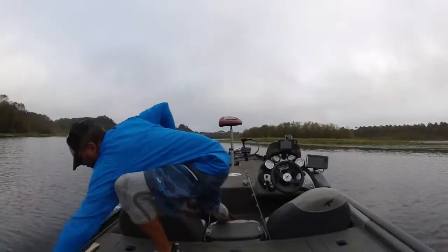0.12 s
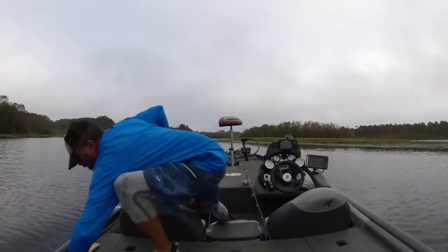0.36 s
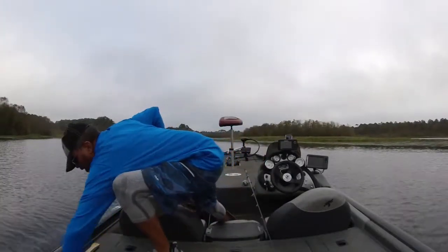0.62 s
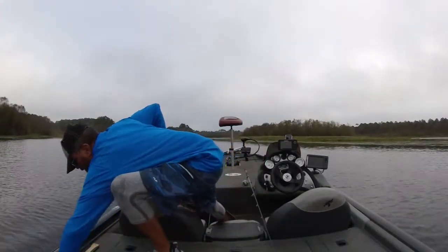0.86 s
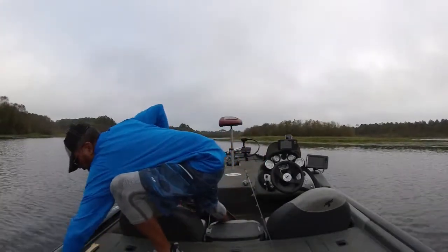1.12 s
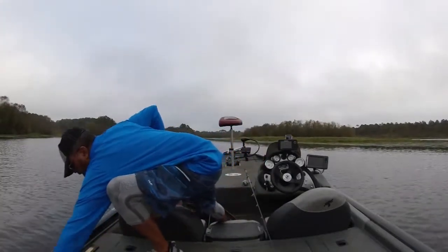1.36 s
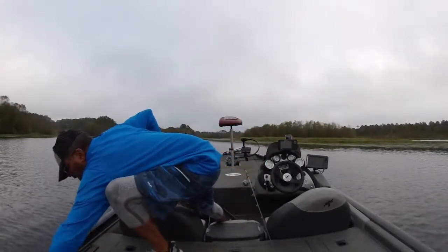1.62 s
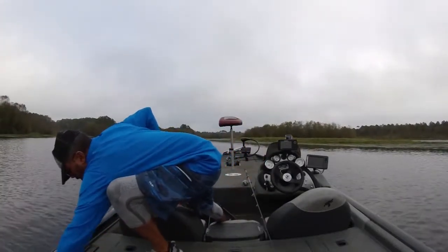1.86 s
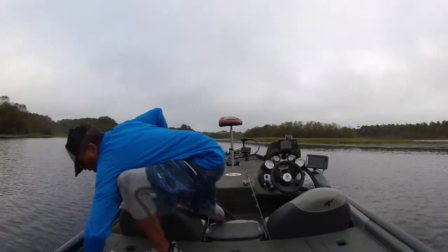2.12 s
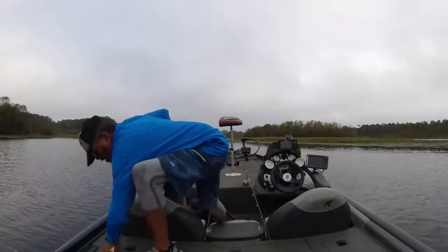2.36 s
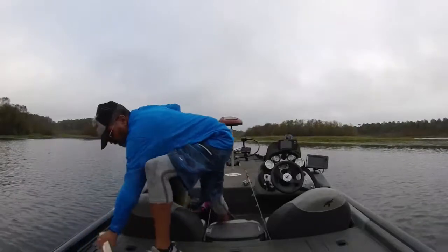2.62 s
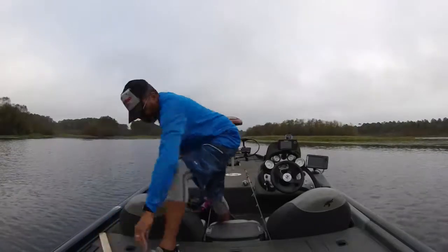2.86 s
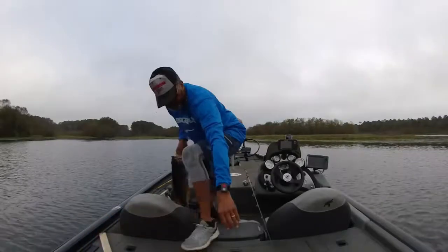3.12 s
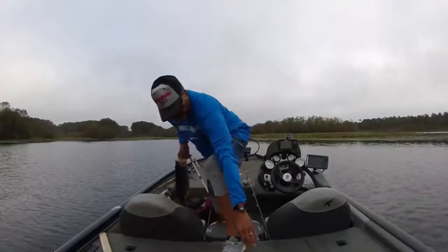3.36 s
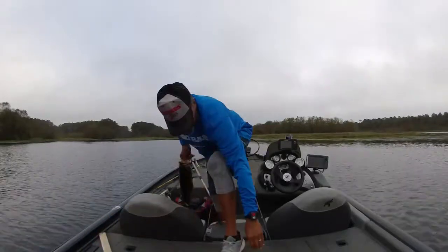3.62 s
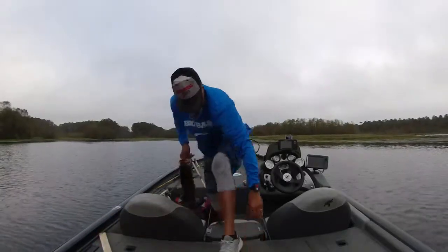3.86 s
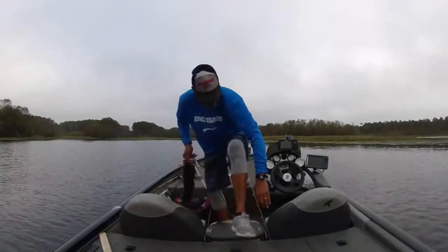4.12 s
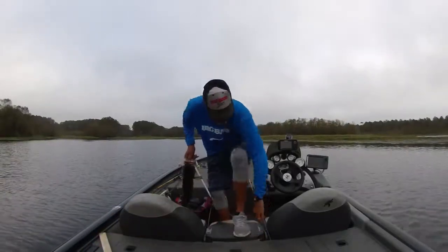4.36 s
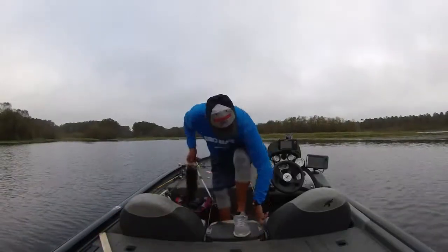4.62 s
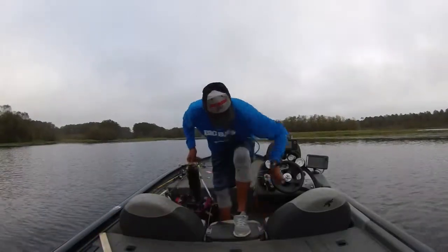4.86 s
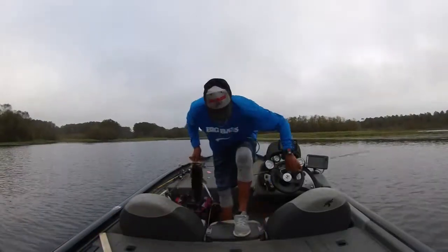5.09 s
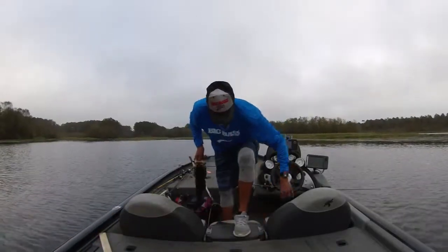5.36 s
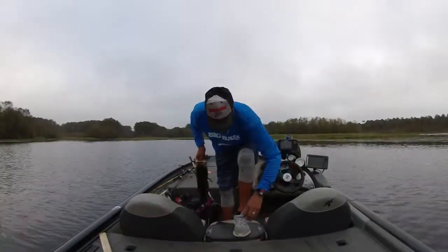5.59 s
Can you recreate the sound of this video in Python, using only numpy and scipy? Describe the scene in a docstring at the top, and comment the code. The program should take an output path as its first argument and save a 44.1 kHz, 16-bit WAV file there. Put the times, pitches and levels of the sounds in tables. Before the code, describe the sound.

A microphone mounted on the boat deck hears hiss with a barely audible whine and low water lapping. After soft scrapes and a small hook's jingle, a thin metal strip drops flat with a bright ringing clack. It is knocked on its edge and end, then scraped along. Dull foot thuds, small rod ticks and, late on, two bright dry knocks close the scene.

```python
"""Over camera hiss with a faint whine, two soft scrapes come first, then cloth rubs and a small hook jingles.
On a small boat deck a metal strip drops, is knocked and dragged; a rod and feet tap and water laps the hull.
Hiss and scrapes are shaped noise or grit; the strip, hook and deck are sets of dying sines set off by
single hits or showers of tiny impacts; the water and the dull bumps are short low swells."""
import sys
import numpy as np
from scipy import signal
from scipy.fft import rfft, irfft
from scipy.io import wavfile

SR = 44100
rng = np.random.default_rng(int(sys.argv[2]) if len(sys.argv) > 2 else 0)


def to_wav(sig):
    """Store sig (one row per channel, or 1-D mono) as 16-bit WAV at the path in sys.argv[1].

    Samples outside -1..1 are clipped; the rate is SR.
    """
    pcm = np.clip(np.atleast_2d(sig), -1, 1) * 32767
    pcm = np.round(pcm).astype(np.int16)
    wavfile.write(sys.argv[1], SR, pcm.T)  # frames by channels


def ratio_of_db(decibels):
    """Turn decibels (scalar or array-like) into linear amplitude factors; 0 dB maps to 1."""
    return 10 ** (np.asarray(decibels, float) / 20)


N = 252693  # length in samples


def unit(x):
    """Scales a sound to energy 1."""
    return x / np.sqrt(np.sum(x ** 2) + 1e-20)


def with_peak(db, sound):
    """Scales a sound so that its highest peak is at db."""
    return ratio_of_db(db) * sound / abs(sound).max()


def coloured(x, spectrum):
    """Filters by a spectrum drawn as (Hz, dB) points on a log-frequency axis."""
    point_hz, point_db = np.transpose(spectrum)
    hz = np.fft.rfftfreq(len(x), 1 / SR)
    gain = ratio_of_db(np.interp(np.log(hz + 1), np.log(point_hz), point_db))
    return irfft(rfft(x) * gain, len(x))


def level(rows, t):
    """Gain along a curve of (seconds, dB) points."""
    return ratio_of_db(np.interp(t, *np.transpose(rows)))


def add(mix, start_s, sound):
    """Mixes a sound in at its start time."""
    part = mix[round(start_s * SR):][:len(sound)]
    part += sound[:len(part)]


def grit(count, per_s, spread_db):
    """Contact force: tiny random impacts of uneven size and either sign, rms 1."""
    hits = rng.random(count) < per_s / SR
    sizes = ratio_of_db(spread_db * np.minimum(rng.exponential(1, count), 4))
    return unit(hits * sizes * rng.choice([-1., 1.], count)) * np.sqrt(count)


def rings(hz, db, fade_s):
    """A struck body's modes as dying sines; db is the height of each spectral peak."""
    t = np.arange(SR // 2) / SR
    sign = (-1.) ** np.arange(len(hz))  # neighbouring modes start in opposite directions
    start = sign * ratio_of_db(db) / fade_s  # a long ring needs less amplitude for the same spectral peak
    waves = ratio_of_db(-60 * t / fade_s[:, None]) * np.sin(2 * np.pi * hz[:, None] * t)
    onset = 1 - np.exp(-t / 0.0005)  # the contact takes a moment
    return unit(onset * (start @ waves))


def puff(spectrum, fade_s):
    """A short dying noise of the given spectrum."""
    t = np.arange(SR // 5) / SR
    noise = unit(coloured(rng.standard_normal(len(t)), spectrum))
    return unit(noise * ratio_of_db(-60 * t / fade_s))


def hump(hz, octaves):
    """A spectrum that is 12 dB down at the given octaves from its centre."""
    steps = np.linspace(-2, 2, num=9)
    return np.transpose([hz * 2 ** (steps * octaves), -12 * steps ** 2])


def push(hz):
    """A soft low bump: a couple of cycles that swell and die, peak 1."""
    cycles = np.arange(SR // 5) / SR * hz
    swell = cycles * np.exp(-cycles / 0.78)  # strongest after 0.78 cycles
    return with_peak(0, swell * np.sin(2 * np.pi * cycles))


def strokes(rows):
    """Level curve (seconds, dB) of overlapping strokes, each 22 dB down after its rise or fall time."""
    peak_s, db, rise_s, fall_s = np.transpose(rows)
    t = np.arange(max(min(peak_s - rise_s), 0), max(peak_s + fall_s), .002)[:, None]
    away = np.where(t < peak_s, (peak_s - t) / rise_s, (t - peak_s) / fall_s)
    return np.transpose([t[:, 0], np.max(db - 22 * away, axis=1)])


def slide(rows, body, per_s, spread_db):
    """Start time and sound of grit under a moving thing, which keeps exciting its body."""
    t = np.arange(rows[0][0], rows[-1][0], 1 / SR)
    force = level(rows, t) * grit(len(t), per_s, spread_db)
    sound = signal.fftconvolve(force, unit(body))
    no_bass = signal.butter(2, 400, "high", fs=SR)  # the sound is thinned below 400 Hz
    return rows[0][0], signal.lfilter(*no_bass, sound)


# Colour of the hiss. Each row: frequency in Hz, relative strength in dB per Hz.
HISS_COLOUR = [(18, -59), (30, -26), (141, -27), (174, -12.5), (319, -6.5), (384, -7.5), (473, -2),
               (512, -5), (822, -0.5), (1760, 1), (2290, -0.5), (14000, -6), (16000, -9.5)]
# Loudness of the hiss over time. Each row: time in seconds, rms level in dB.
HISS_LEVEL = [(0, -64.5), (1.0, -70.5), (1.28, -70.5), (1.58, -59), (1.8, -62.5), (2.49, -63),
              (2.66, -58.5), (2.9, -61.5), (4.21, -64), (4.64, -68.5), (4.99, -66), (5.14, -62.5),
              (5.73, -66)]
# Steady tones of the whine. Each row: frequency in Hz, rms level in dB.
WHINE_TONES = [(839.8, -87.5), (1798, -90), (2159, -90.5), (2875, -88.5), (3478, -95), (3596, -92.5),
               (4915, -91)]


def camera():
    """Camera noise: smooth coloured hiss with a few faint steady sines."""
    t = np.arange(N) / SR
    sound = unit(coloured(rng.standard_normal(N), HISS_COLOUR)) * np.sqrt(N) * level(HISS_LEVEL, t)
    for hz, db in WHINE_TONES:
        sound += ratio_of_db(db) * np.sqrt(2) * np.sin(2 * np.pi * (hz * t + rng.random()))
    return sound


# Loudness of the lapping water over time. Each row: time in seconds, rms level in dB.
LAP_LEVEL = [(0, -80), (.3, -91.5), (1.3, -85.5), (1.6, -74), (2.0, -98.5), (2.5, -77.5), (3.0, -84.5),
             (3.5, -83.5), (3.8, -97), (4.3, -92), (4.7, -98), (5.1, -80.5), (5.73, -100)]


def lapping():
    """Ripples slap the hull: low lumps of several pitches, about 12 a second of each."""
    lumps = [unit(push(hz)) for hz in (85, 127, 172.2, 224, 280)]
    slaps = sum(signal.oaconvolve(grit(N, 12, 3.5), lump)[:N] for lump in lumps)
    return slaps * level(LAP_LEVEL, np.arange(N) / SR) / np.sqrt(len(lumps))


# Feet and knees on the hull. Each row: start in seconds, peak level in dB, pitch in Hz.
HULL_BUMPS = [(1.536, -58.5, 330), (1.556, -64, 108), (2.855, -67, 180), (2.901, -56.5, 204),
              (2.953, -68, 121), (3.002, -64, 158), (3.072, -66, 181), (3.147, -70, 151), (3.19, -71, 132),
              (3.385, -63.5, 199), (3.41, -71, 85), (4.985, -71.5, 202), (5.575, -69.5, 201)]


def hull_bumps(mix):
    """Feet and knees bump the hull, each bump one soft low push."""
    for start_s, db, hz in HULL_BUMPS:
        add(mix, start_s, ratio_of_db(db) * push(hz))


# Strokes of the cloth. Each row: peak time in seconds, rms level in dB before the bass cut,
# rise and fall in seconds.
CLOTH_STROKES = [(1.268, -63.5, 0.087, 0.11), (1.312, -68, 0.057, 0.07)]


def cloth_rub(mix):
    """Cloth rubs on the rail: many tiny contacts, each a short puff of noise around 1470 Hz."""
    add(mix, *slide(strokes(CLOTH_STROKES), puff(hump(1470, 1.0), 0.018), 1500, 3.3))


# Modes of a small hook. Each row: frequency in Hz, relative height in dB, seconds to fade by 60 dB.
HOOK_MODES = [(1880, -23.5, 0.26), (5230, -3, 0.09), (6400, -2, 0.06), (7000, -3, 0.12), (8350, -8.5, 0.12),
              (8930, 3.5, 0.16), (9345, -4, 0.15), (10000, -1, .15), (11220, 1, 0.3), (11900, -6, 0.17),
              (12480, -14, .1)]
# Strokes of the jingle. Each row: peak time in seconds, rms level in dB before the bass cut,
# rise and fall in seconds.
JINGLE_STROKES = [(1.465, -66, .015, 0.0293), (1.498, -42, 0.031, 0.02)]


def hook_jingle(mix):
    """A small hook jingles: a shower of very uneven impacts sets off its ringing modes."""
    add(mix, *slide(strokes(JINGLE_STROKES), rings(*np.transpose(HOOK_MODES)), 3000, 4.6))


# Short pings, three of small metal and one low ring of the deck.
# Each row: start in seconds, peak level in dB, pitch in Hz, seconds to fade by 60 dB.
PING_ROWS = [(1.45, -41, 5920, 0.024), (1.462, -39, 6490, 0.041), (1.462, -56, 1880, 0.47),
             (2.9, -60.5, 545, 0.36)]


def pings(mix):
    """Each ping rings on one note with a weak neighbour 45 Hz above."""
    for start_s, db, hz, fade_s in PING_ROWS:
        sound = rings(np.array([hz, hz + 45]), np.array([0, -19]), np.array([fade_s, fade_s]))
        rise = np.minimum(np.arange(len(sound)) / SR / 0.0029, 1)  # builds over 2.9 ms
        add(mix, start_s, with_peak(db, sound * rise))


# Modes of the deck before the small shift at each spot.
# Each row: frequency in Hz, relative height in dB, seconds to fade by 60 dB.
DECK_MODES = [(514, -0.5, 0.077), (629, -11.5, 0.056), (776, 0.5, 0.07), (927, -10.5, 0.047),
              (1165, -1.5, 0.096), (1400, -9, .04), (1630, -4.5, 0.04)]


def tap(db, hz, octaves, fade_s, deck_db):
    """A dry click with a weak longer tail, and the hollow deck ringing under it."""
    shape = hump(hz, octaves)
    contact = unit(coloured(signal.unit_impulse(SR // 5, int(SR / hz / octaves)), shape))
    click = ratio_of_db(-5) * contact + puff(shape, fade_s) + ratio_of_db(-11.5) * puff(shape, 4 * fade_s)
    mode_hz, mode_db, mode_fade_s = np.transpose(DECK_MODES)
    spot = rng.uniform(.96, 1.04, len(DECK_MODES))  # each spot is tuned a little differently
    deck = signal.fftconvolve(click, rings(mode_hz * spot, mode_db, mode_fade_s))[:len(click)]
    sound = unit(click) + ratio_of_db(deck_db) * unit(deck)
    # a narrow spectrum builds more slowly
    rise = np.minimum(np.arange(len(sound)) / SR * hz * octaves / 0.9, 1)
    # a light soft contact has no bass and no top treble
    soft = signal.butter(4, [360, 11500], "band", fs=SR, output="sos")
    return with_peak(db, signal.sosfilt(soft, sound * rise))


# Blunt knocks. Each row: start in seconds, peak level in dB, centre in Hz, spread in octaves,
# seconds for the main noise to fade by 60 dB.
DECK_KNOCKS = [(1.528, -57, 500, 0.73, 0.027), (1.554, -28.5, 945, 0.51, 0.045),
               (1.556, -34.5, 479, 0.3, 0.04), (2.451, -39.5, 1070, 1.56, 0.085),
               (2.513, -27.5, 1210, 1.23, 0.061), (3.129, -46, 680, 0.68, 0.05),
               (3.397, -48.5, 1250, 0.53, 0.018), (4.127, -52.5, 890, 0.78, 0.025),
               (4.315, -53.5, 900, 0.96, 0.03), (4.951, -43, 806, 0.5, 0.044),
               (5.018, -39.5, 674, 0.9, 0.082)]


def deck_knocks(mix):
    """Blunt knocks on the deck, with much of its hollow ring (-5.5 dB)."""
    for start_s, *row in DECK_KNOCKS:
        add(mix, start_s, tap(*row, deck_db=-5.5))


# Bright clicks. Each row: start in seconds, peak level in dB, centre in Hz, spread in octaves,
# seconds for the main noise to fade by 60 dB.
ROD_CLICKS = [(4.122, -48, 5800, 0.55, 0.022), (4.368, -48, 4980, 1.2, 0.013), (4.477, -56, 4390, .49, 0.1),
              (4.485, -48, 4860, 0.35, 0.042), (4.502, -37.5, 6700, 0.96, 0.013),
              (4.9497, -25, 2650, 0.81, 0.027), (4.9493, -23.5, 5430, 0.68, 0.019),
              (5.0182, -30, 3000, 1.06, 0.048), (5.017, -32.5, 6600, 0.55, 0.029)]


def rod_clicks(mix):
    """Bright clicks of the rod, with little of the deck's ring (-23 dB)."""
    for start_s, *row in ROD_CLICKS:
        add(mix, start_s, tap(*row, deck_db=-23))


# Short scraping strokes. Each row: peak time in seconds, rms level in dB before the bass cut,
# rise and fall in seconds.
SCRAPE_STROKES = [(.002, -46.5, 0.014, 0.064), (.02, -44.5, 0.015, 0.059), (1.423, -49.5, 0.039, 0.021),
                  (1.46, -48.5, 0.033, 0.056), (1.497, -59, 0.03, 0.043), (3.143, -59.5, 0.024, 0.043),
                  (5.015, -51.5, 0.021, 0.0067)]
# Colour of the scrape. Each row: frequency in Hz, relative strength in dB per Hz.
SCRAPE_COLOUR = [(120, -67), (200, -32), (570, -6.5), (647, -24), (818, -9), (1380, -3), (3870, -15),
                 (5170, -1.5), (7550, -2), (10100, -2.5), (15000, -40)]


def scrapes(mix):
    """Short strokes of dense, fairly even grit, coloured by a fixed spectrum."""
    for row in SCRAPE_STROKES:
        body = coloured(signal.unit_impulse(256, 64), SCRAPE_COLOUR)
        add(mix, *slide(strokes([row]), body, 5000, 1.5))


# Pitches of the strip's clear modes, in Hz.
MODE_HZ = [210, 370, 740, 853, 879, 986, 1067, 1338, 1572, 1879, 1930, 2219, 2350, 2492, 2745, 2809, 3153,
           3277, 3517, 3662, 3805, 3875, 4116, 4186, 4390, 4628, 4972, 5317, 5495, 5597, 5761, 6210, 6459,
           6850, 6958, 7176, 7512, 7623, 7706, 7996, 8223, 8319, 8811, 9151, 9341, 9644, 9942, 10500, 10783,
           11090, 11197, 11667, 12450, 13186, 13950]
# One row for each of those modes. Each row: relative height in dB when struck flat, when dragged on
# its edge, when knocked at its end, then seconds to fade by 60 dB when free.
MODE_ROWS = [(6.5, -44.5, -32, 1), (-50.5, -24.5, -18.5, 1.3), (-59, -23, -37, 0.47),
             (-4.5, -41.5, -28.5, 0.092), (-15.5, -39.5, -34, 0.6), (-18.5, -21.5, -13.5, 0.51),
             (2.5, -42.5, -31.5, 0.19), (9.5, -55, -35, 0.21), (-20.5, -30, -16.5, 0.25),
             (-9.5, -32, -26, 0.83), (-10, -27.5, -18.5, 0.37), (0, -36.5, -22.5, 0.92),
             (-34, -22.5, -21, 0.29), (-34.5, -36.5, -19.5, .25), (-14, -46, -27.5, 0.081),
             (-38, -15, -10, 0.35), (-12, -30.5, -12.5, 0.55), (-32, -1, -16.5, 0.3), (-24, -34, -14.5, .4),
             (-9.5, -35.5, -6.5, 1.2), (-38.5, -5, -14, 0.23), (-39.5, -16, -22, .5), (-5, -29, -10, 0.97),
             (-14, -14, -11, 1.1), (-9.5, -10, -9.5, 0.18), (-4, -44, -13, 0.29), (-12, 1, -6, 0.14),
             (-5, -26, -24.5, 0.08), (-8, -40, -38.5, 1.4), (-18.5, 4, 0.5, 0.13), (-22.5, -14, -3, 0.25),
             (-16.5, 1, -1, 0.13), (-18, -17, 3.5, 0.21), (-36, -3.5, -15, 0.3), (-31.5, -0.5, -24, 0.32),
             (-40.5, -10.5, -27.5, 0.3), (-18, -4, -6.5, 0.27), (-15, -10.5, -21.5, 0.36),
             (-30.5, -11.5, -26, .2), (-24.5, -12, -20, .5), (-14.5, -7, -32.5, 0.32),
             (-21.5, -14.5, -35.5, 0.28), (-7, -30, -37, 0.12), (-17.5, -24.5, -29, .3),
             (-7.5, -23.5, -42.5, 0.14), (-1.5, -20.5, -40, 0.23), (0.5, -14, -36.5, 0.21),
             (-2.5, -20.5, -41.5, 0.25), (-9.5, -15.5, -41, 0.23), (-20, -33, -47, 0.15),
             (-10.5, -28, -40, 0.26), (-10.5, -30.5, -50, 0.12), (-16.5, -40.5, -40.5, 0.15),
             (-20, -34.5, -50, 0.25), (-20, -39, -55.5, .15)]
# Colour of the many short modes between the clear ones, struck flat and on the edge.
# Each row: frequency in Hz, relative strength in dB per Hz.
FLAT_CLATTER = [(120, -71.5), (200, -59.5), (957, -11), (1350, -14), (1540, -12.5), (2170, -20),
                (5010, -15), (7300, -25), (9660, -20.5), (12900, -23.5), (15500, -52.5)]
EDGE_CLATTER = [(120, -82), (200, -37.5), (974, -28), (1330, -43.5), (2960, -19.5), (3180, -10),
                (3610, -15.5), (4400, -8.5), (5590, 0.5), (10200, -26), (13500, -31), (15500, -45)]
# Share of those short modes in dB: struck flat, on the edge, at the end.
CLATTER_SHARE = (-3.5, -6, -4.5)


def strip(place, ring):
    """Answer of the metal strip to one impact; contact with deck or hand shortens its ring."""
    *heights, free_fade_s = np.transpose(MODE_ROWS)
    mode_db = [np.interp(place, range(3), height) for height in np.transpose(heights)]
    clear = rings(np.array(MODE_HZ), mode_db, free_fade_s * ring)
    t = np.arange(SR // 2) / SR
    noise = rng.standard_normal(len(t))
    edge = np.clip(place, 0, 1)
    noise = (1 - edge) * unit(coloured(noise, FLAT_CLATTER)) + edge * unit(coloured(noise, EDGE_CLATTER))
    # rises in 0.14 ms and fades by 60 dB in 71 ms
    clatter = unit(noise * ratio_of_db(-60 * t / 0.071) * np.minimum(t / 0.00014, 1))
    clatter *= ratio_of_db(np.interp(place, range(3), CLATTER_SHARE))
    thin = signal.butter(2, 450, "high", fs=SR)  # the strip's sound is thinned below 450 Hz
    return signal.lfilter(*thin, clear + clatter)


# Loudness of the drag over the deck. Each row: time in seconds, rms level in dB before the bass cut.
DRAG_LEVEL = [(2.724, -19), (2.752, -19.5), (2.756, -28.5), (2.766, -25.5), (2.778, -26.5), (2.8, -26),
              (2.817, -29), (2.835, -26.5), (2.855, -36.5), (2.87, -45), (2.9, -55)]


def strip_drag(mix):
    """The strip is dragged over the deck, nearly on its edge, and grit keeps it ringing."""
    add(mix, *slide(DRAG_LEVEL, strip(place=0.94, ring=0.42), 900, 4.0))


# Times in seconds when a hand or the deck touches the strip and stops the ring.
TOUCHES = [1.847, 2.585, 2.64, 2.71, 2.88]


def blow(start_s, db, place, chatter_s, ring, sharp):
    """An impact, then the strip chatters on the deck until it settles; a glancing blow builds up."""
    t = np.arange(SR // 5) / SR
    sharp = np.clip(sharp, 0, .99)
    rise = np.minimum(t / (0.0045 * (1 - sharp)), 1)
    force = grit(len(t), 2500, 5.) * ratio_of_db(-60 * t / chatter_s) * rise
    force *= 1 - .85 * sharp  # a clean blow bounces little
    force[0] = 24 * sharp  # the first hit
    sound = signal.fftconvolve(force, strip(place, ring))
    next_touch = min(touch for touch in TOUCHES if touch > start_s)
    held_s = np.maximum(np.arange(len(sound)) / SR + start_s - next_touch, 0)
    return with_peak(db, sound) * ratio_of_db(-60 * held_s / 0.16)  # a touch adds 60 dB of fading in 0.16 s


# Blows to the strip. Each row: start in seconds, peak level in dB before any touch,
# place (0 flat, 1 edge, 2 or more end), seconds for the chatter to fade by 60 dB, sharpness from 0 to 1.
STRIP_BLOWS = [(1.552, -22, 0.03, 0.0094, 0.6), (1.5541, -9.5, 0.062, 0.031, 0.8),
               (1.577, -20.5, 0.18, .025, 0.3), (2.451, -30, 0.96, .049, 0.1), (2.464, -52, 1.7, 0.033, .4),
               (2.513, -19, 0.91, 0.033, 1), (2.521, -18, 3.8, 0.065, 0.44), (2.531, -9.5, 2.1, 0.039, 0.8),
               (2.5857, -19, 1.6, .04, 0.9), (2.621, -28, 1.8, 0.05, 0.4), (2.632, -30.5, 2, 0.029, 0.5),
               (2.655, -39.5, 1.014, 0.2, 0.2), (2.7222, -13, 1.12, 0.034, 0.6)]
# Share of the free fading time that is left: struck flat, on the edge, at the end.
RING_LEFT = (0.88, 0.24, 0.7)


def strip_blows(mix):
    """The strip is dropped and knocked; where it is hit decides which modes sound and for how long."""
    for start_s, db, place, chatter_s, sharp in STRIP_BLOWS:
        ring = np.interp(place, range(3), RING_LEFT)
        add(mix, start_s, blow(start_s, db, place, chatter_s, ring, sharp))


def scene():
    """All sources in one channel."""
    mix = camera() + lapping()
    for source in (hull_bumps, cloth_rub, hook_jingle, pings, deck_knocks, rod_clicks,
                   scrapes, strip_drag, strip_blows):
        source(mix)
    return mix[None]


def top_cut(x):
    """Nothing passes above the cut-off."""
    return signal.sosfilt(signal.butter(12, 15830, fs=SR, output="sos"), x)


def record(dry):
    """Turns the finished mix into the sound that is written out."""
    return top_cut(dry)


dry = scene()
out = record(dry)
to_wav(out)
```